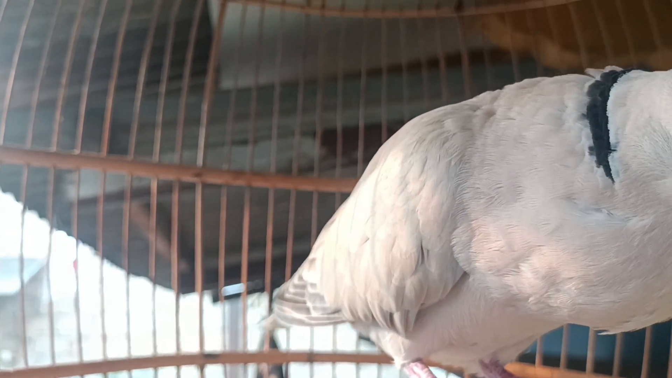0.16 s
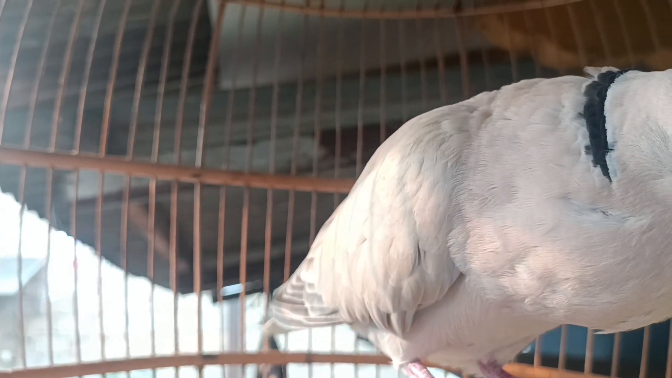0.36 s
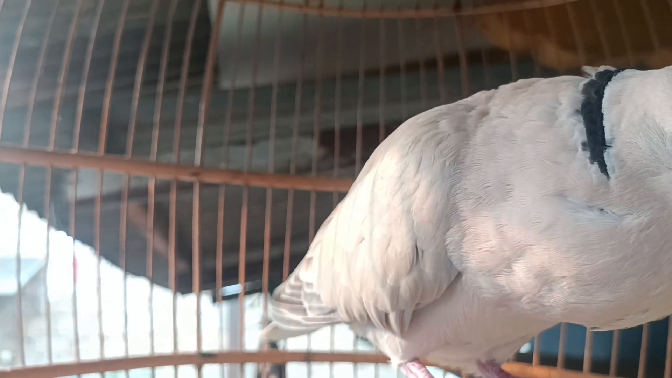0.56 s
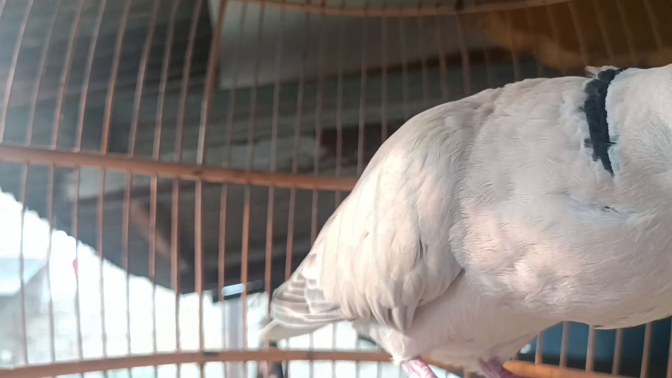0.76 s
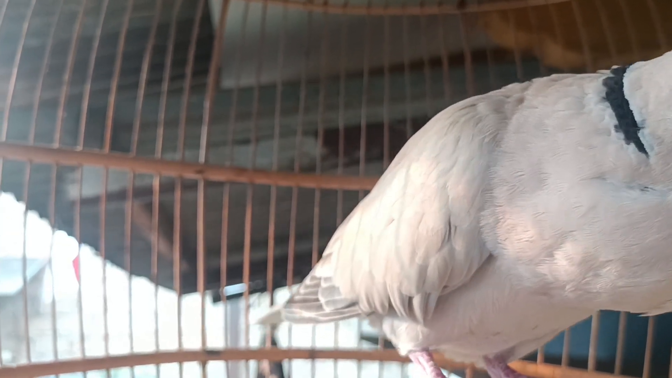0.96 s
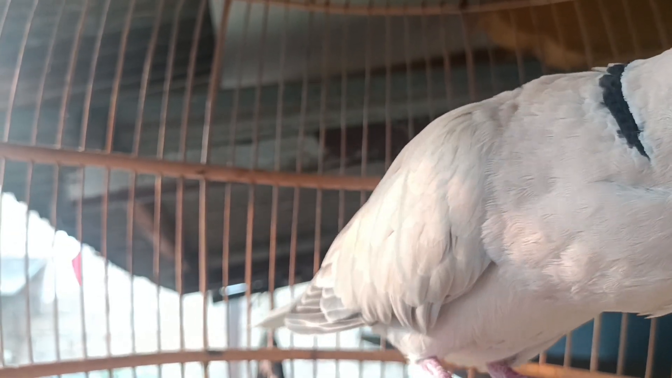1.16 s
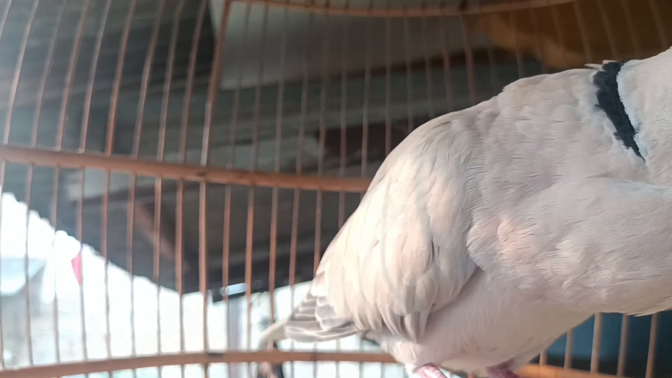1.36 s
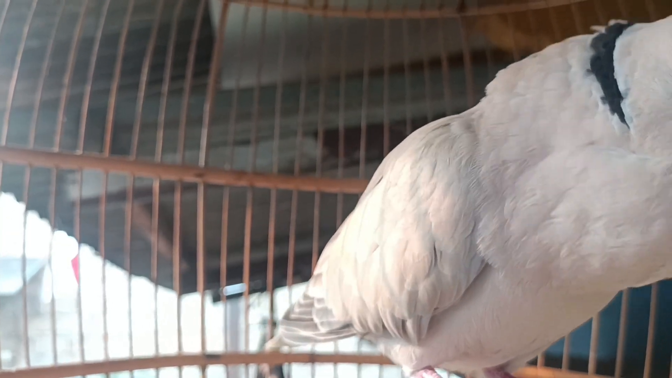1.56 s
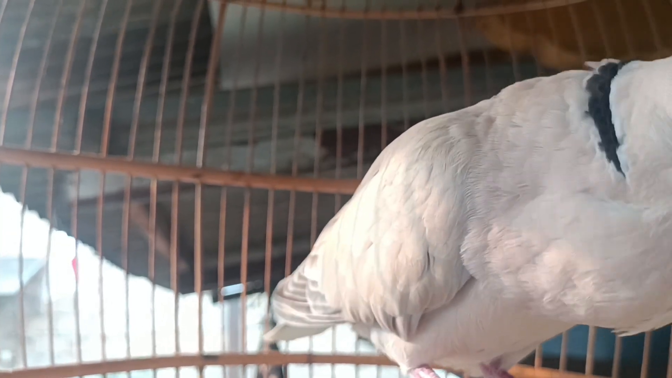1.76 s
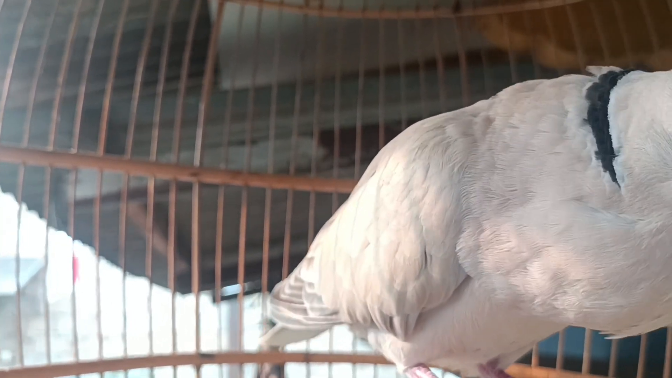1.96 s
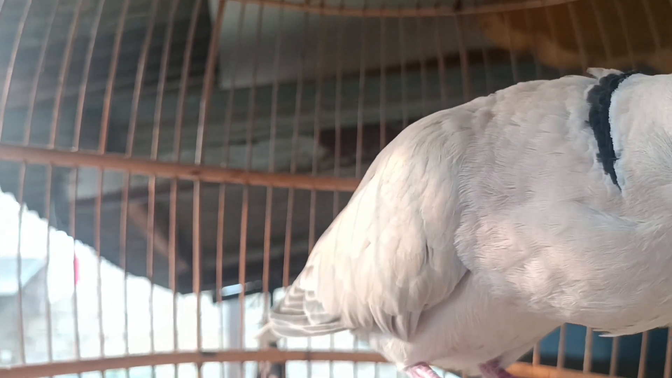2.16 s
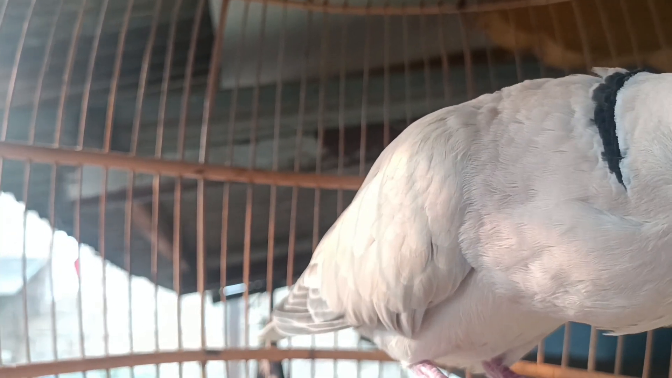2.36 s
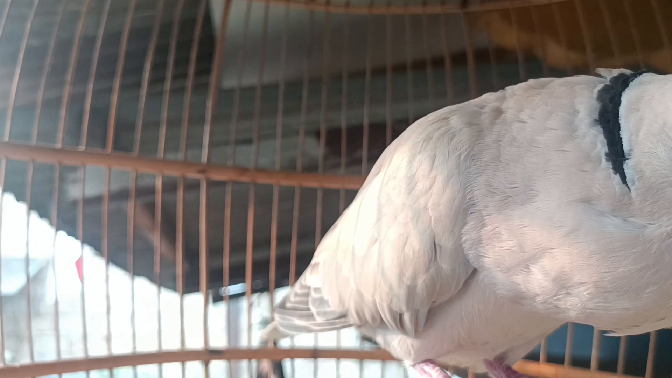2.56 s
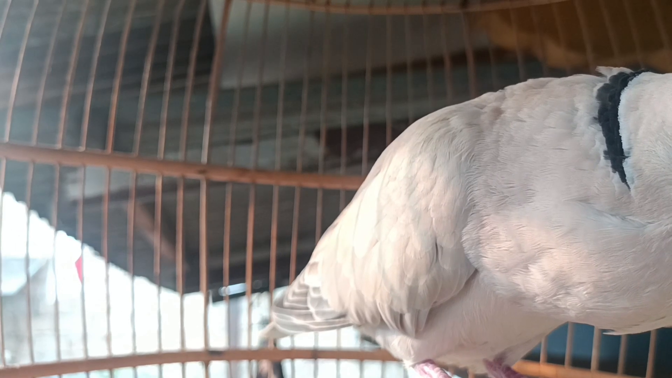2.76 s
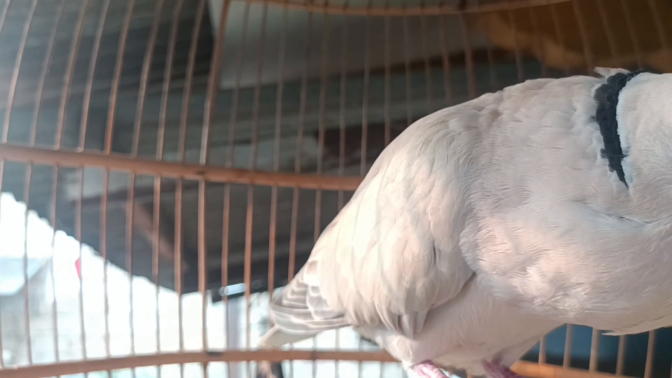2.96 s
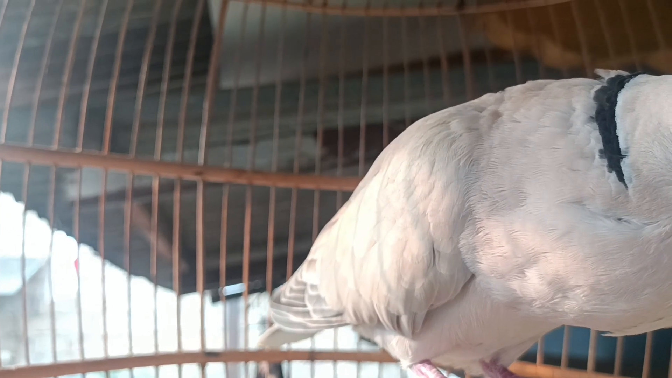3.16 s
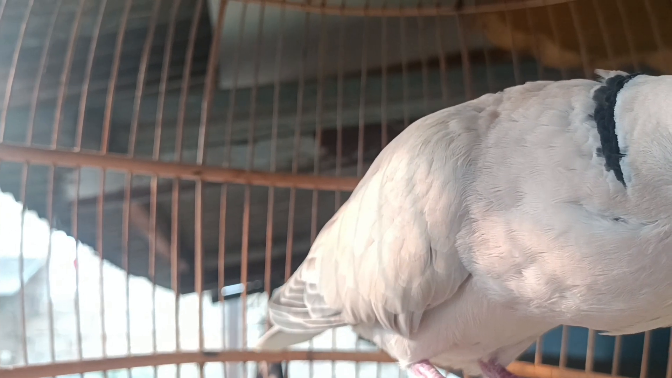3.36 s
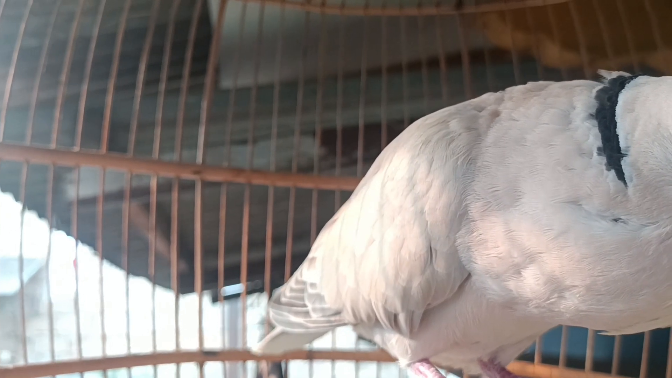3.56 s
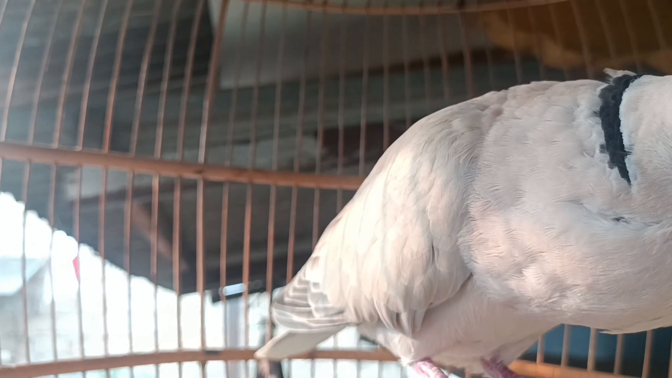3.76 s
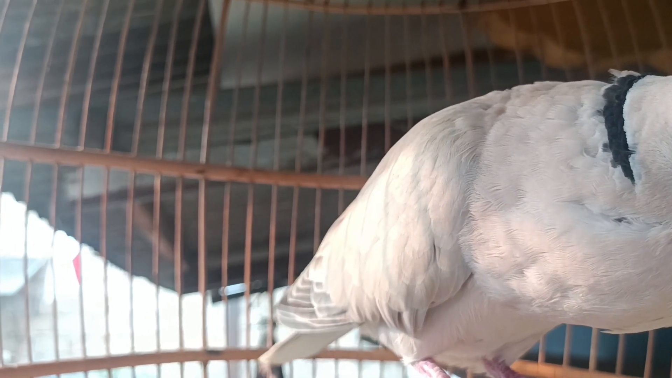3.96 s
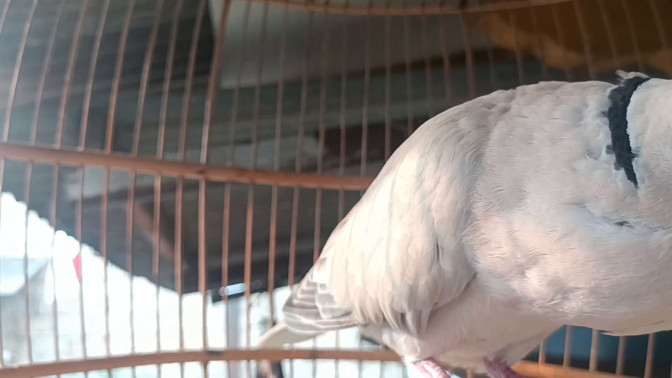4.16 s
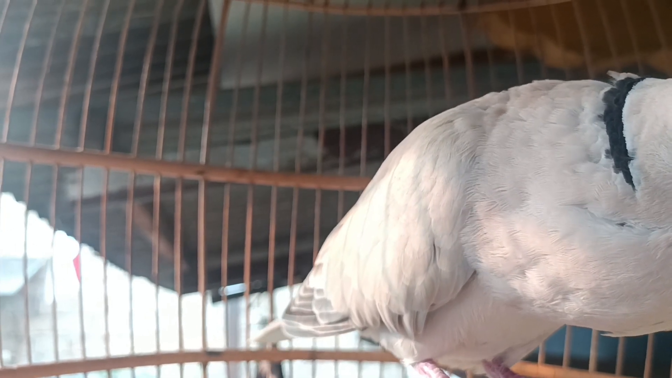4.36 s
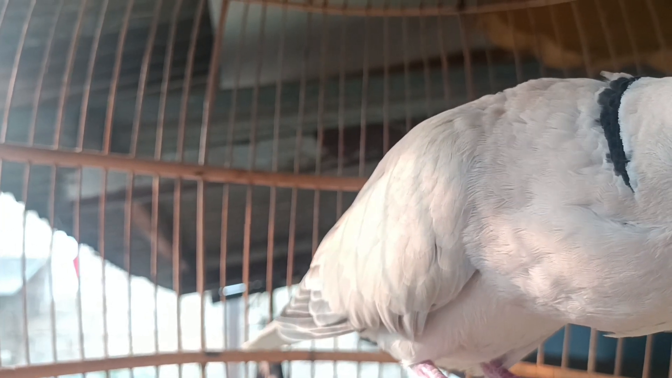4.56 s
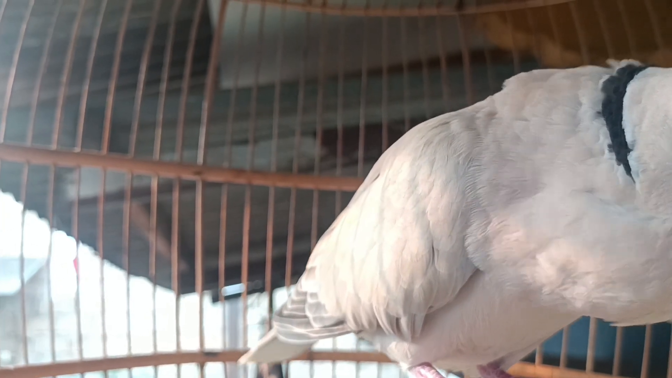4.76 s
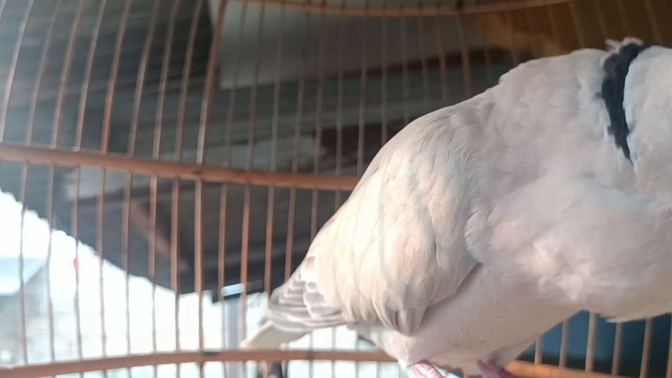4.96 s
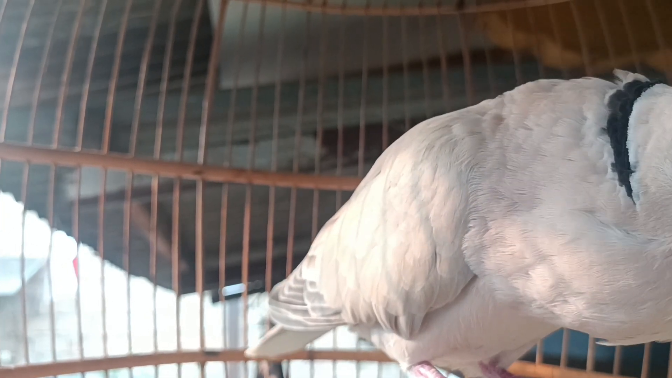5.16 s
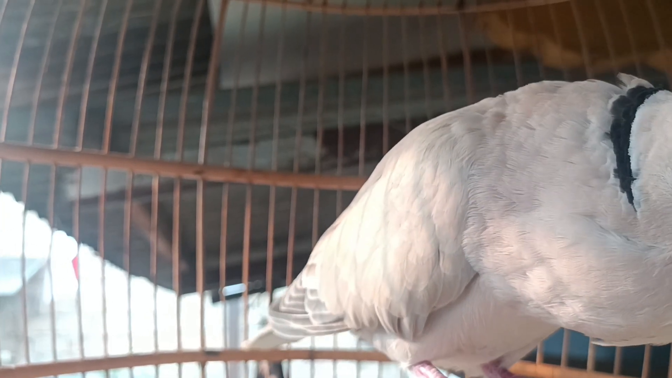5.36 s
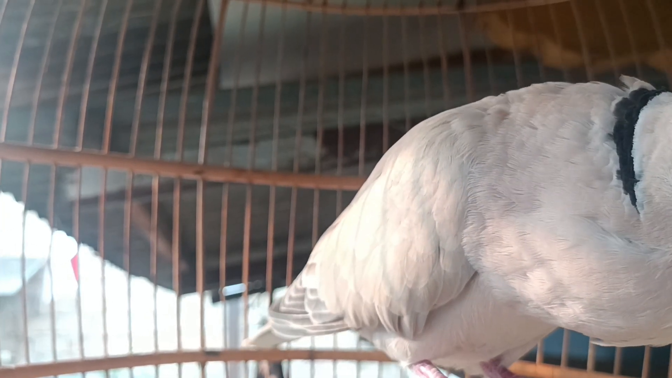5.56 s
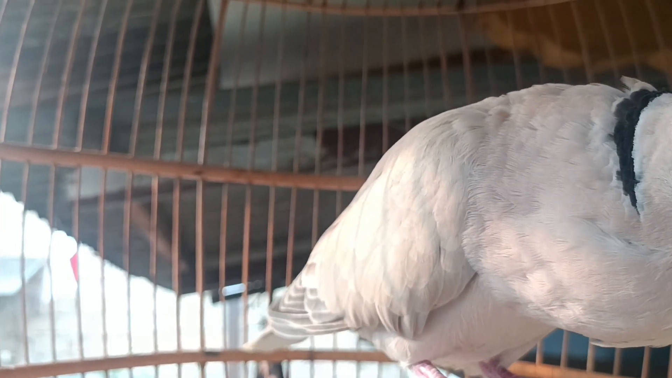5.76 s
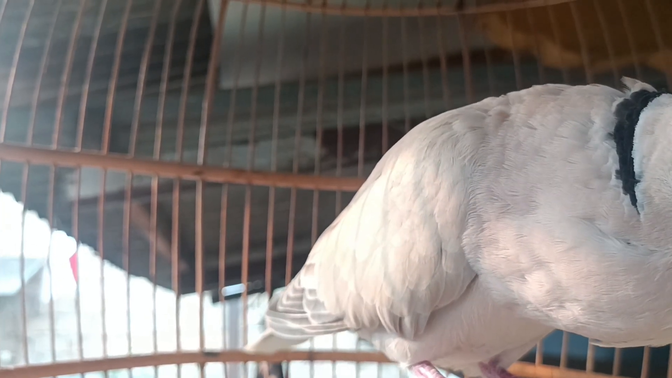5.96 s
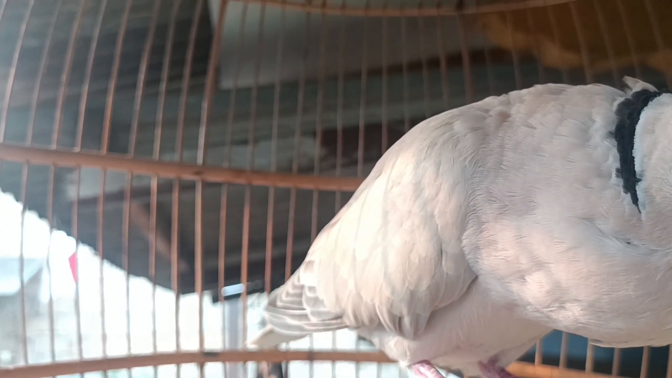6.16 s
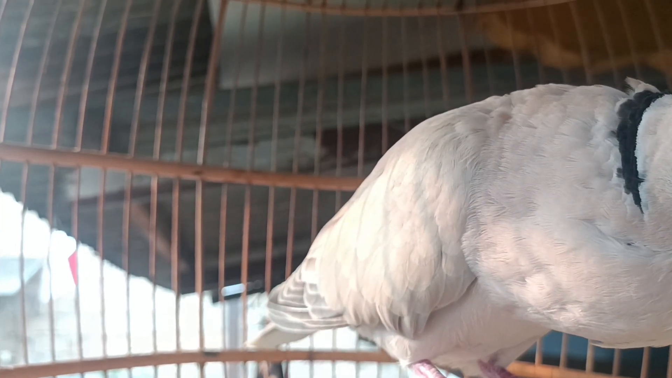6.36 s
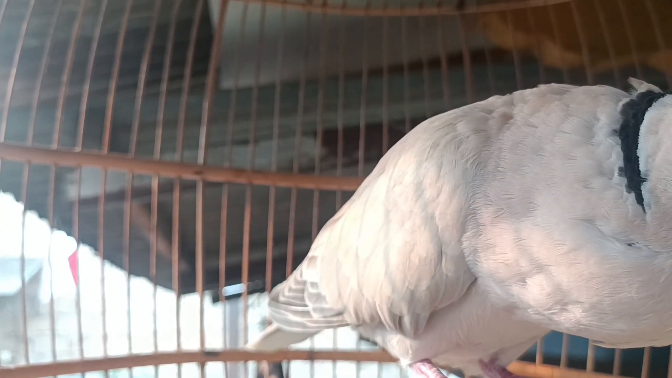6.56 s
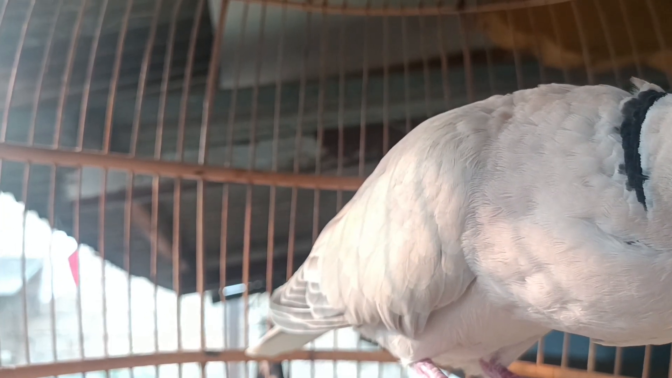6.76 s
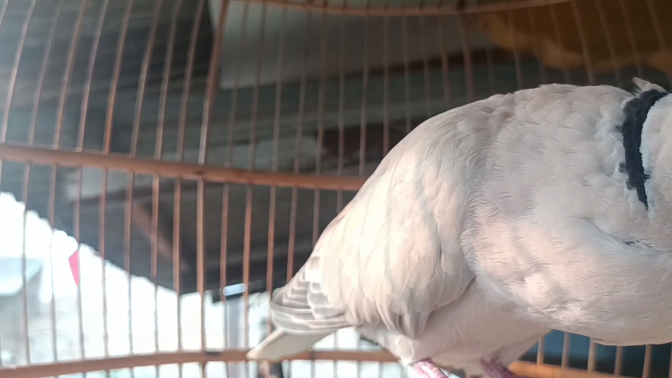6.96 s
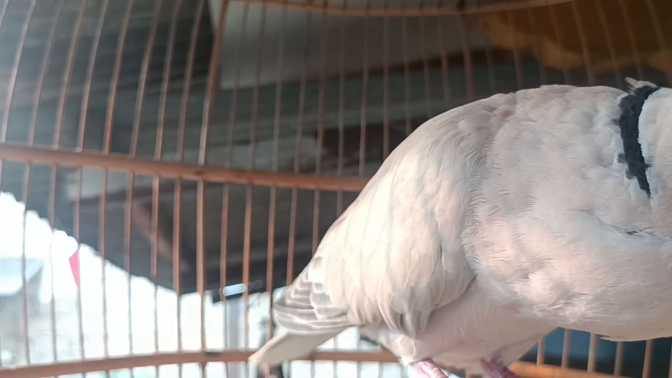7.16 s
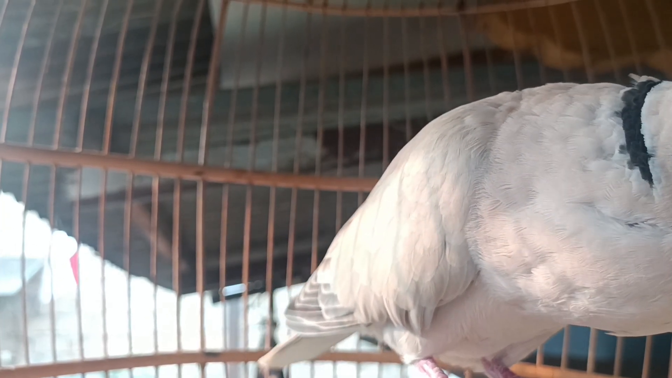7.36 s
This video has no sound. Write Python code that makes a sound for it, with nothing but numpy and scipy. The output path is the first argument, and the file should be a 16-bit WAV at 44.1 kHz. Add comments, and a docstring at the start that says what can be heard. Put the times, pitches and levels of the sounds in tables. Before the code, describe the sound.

Close, hollow dove cooing in falling notes and accelerating hoot rolls, soft nasal indrawn groans between phrases, a far hoarse animal wail, faint traffic rumble.

```python
"""A long falling coo opens the scene: a collared dove, close by, goes on with short notes and rolls of quick hoots.
One sliding sine rings through a crop resonance; tense high notes leak overtones. Feathers rustle as shaped noise.
Between phrases the dove draws air with a soft nasal groan, a harmonic buzz through chest and nose resonances.
Further off an animal gives one long cat-like wail, hoarse harmonics with a strong echo behind them.
Below lies a street, low banded noise with wavering motor hum; small noisy clicks dot the scene."""
import sys
import numpy as np
from scipy import signal
from scipy.io import wavfile
from scipy.ndimage import uniform_filter1d, minimum_filter1d

SR = 44100
rng = np.random.default_rng(int(sys.argv[2]) if len(sys.argv) > 2 else 0)


def pcm_store(signal):
    """Save signal as 16-bit PCM."""
    levels = np.round(np.clip(np.atleast_2d(signal), -1, 1) * 32767)
    wavfile.write(sys.argv[1], SR, levels.astype(np.int16).T)


N = 326781
TIME = np.arange(N) / SR   # seconds


def from_db(db):
    """Decibels to gain."""
    return 10 ** (np.asarray(db) / 20)


def rms_one(x):
    """Scale to unit power."""
    return x / np.sqrt(np.mean(x ** 2) + 1e-20)


def in_time(rows):
    """Each column of a curve at every sample; the first column is seconds."""
    seconds, *columns = np.transpose(sorted(map(tuple, rows)))
    return [np.interp(TIME, seconds, column) for column in columns]


def at_hz(points, hz):
    """Read a spectrum on a log-frequency axis."""
    f, value = np.transpose(points)
    return np.interp(np.log(hz), np.log(f), value)


def drift(rate_hz):
    """Slow chance with spread 1: noise through two equal one-pole lowpasses at rate_hz."""
    step = 40   # computed at every 40th sample, then interpolated
    r = np.exp(-2 * np.pi * step * rate_hz / SR)
    noise = rng.standard_normal(N // step + 2002)
    slow = signal.lfilter([1], [1, -2 * r, r * r], noise)[2000:]   # skip the filter's start
    return np.interp(np.arange(N) / step, np.arange(len(slow)), rms_one(slow))


def gate(spans, edge_s):
    """1 inside the spans, 0 outside, with rounded edges."""
    on = np.zeros(N)
    for start, end in spans:
        on[max(0, int(start * SR)):int(end * SR)] = 1
    width = max(2, int(edge_s * SR))
    return uniform_filter1d(uniform_filter1d(on, width), width)


def swell(middle_s, half_s):
    """A bell-shaped rise and fall of height 1."""
    return np.exp(-((TIME - middle_s) / half_s) ** 2)


def phase_of(hz):
    """Running phase of an oscillator."""
    return 2 * np.pi * np.cumsum(hz) / SR


def harmonics(hz, phase, spectrum, orders, flutter_db):
    """Harmonics of a pitch track through fixed resonances, each fluttering a little."""
    total = 0
    for k in orders:
        level_db = at_hz(spectrum, k * hz) + flutter_db * drift(12)
        total = total + from_db(level_db) * np.sin(k * phase)
    return np.sqrt(2) * total


def resonance(x, hz, width_hz):
    """Two-pole resonance with gain 1 on top."""
    r = np.exp(-np.pi * width_hz / SR)
    zeros = np.array([1, 0, -1]) * (1 - r * r) / 2
    poles = [1, -2 * r * np.cos(2 * np.pi * hz / SR), r * r]
    return signal.lfilter(zeros, poles, x + 1e-18)


# How alike left and right are in the noise beds. Each row: frequency in Hz, likeness (1 is mono).
STEREO_LIKENESS = [(30, 0.18), (400, 1), (1000, 0.2), (2200, 0.079), (5000, 0.44), (14000, 0.65)]


def banded_noise(spectrum, patchy_db):
    """Half-octave bands of stereo noise, each with its own flicker and likeness; rms 1."""
    edges = 22 * 2 ** np.arange(0, 9.6, .5)   # Hz
    out, white = 0, rng.standard_normal((2, 2, N))
    for k, (low, high) in enumerate(zip(edges, edges[1:])):
        if high < spectrum[0][0]:
            continue
        band = signal.butter(2, [low, high], "band", fs=SR, output="sos")
        mid, side = signal.sosfilt(band, white[k % 2])   # neighbouring bands use different noise
        hz = np.sqrt(low * high)
        alike = np.clip(at_hz(STEREO_LIKENESS, hz), -1, 1)
        stereo = np.sqrt(1 + alike) * mid + np.sqrt(1 - alike) * side * [[1], [-1]]
        out = out + from_db(at_hz(spectrum, hz) + patchy_db * drift(12)) * stereo
    return rms_one(out)


def reverb(x, t60_s, alike):
    """Dense reflections that die away, partly shared by the two microphones."""
    t = np.arange(SR) / SR
    decay = from_db(-60 * t / t60_s) * (t > .004)   # nothing for the first 4 ms
    mid, side = rng.standard_normal((2, SR)) * decay
    alike = np.clip(alike, 0, 1)
    tails = np.sqrt(1 + alike) * mid + np.sqrt(1 - alike) * side * [[1], [-1]]
    return signal.fftconvolve(x[None], tails / np.sqrt(np.sum(tails[0] ** 2)), axes=1)[:, :N]


def placed(x, right_lead_ms, left_louder_db):
    """A source reaches the two microphones at slightly different times and levels."""
    half_lag_s = right_lead_ms / 2000
    return np.array([np.interp(TIME - side * half_lag_s, TIME, x) * from_db(side * left_louder_db / 2)
                     for side in (1, -1)])


def sounding(calls, join_s=.006):
    """The spans in which the voice is on; calls that touch run into each other without a break."""
    spans = []
    for start, end in sorted((call[0][0], call[-1][0]) for call in calls):
        if spans and start - spans[-1][1] < join_s:
            start = spans.pop()[0]
        spans.append((start, end))
    return spans


# Long coos, sinking overall; the first two end in a low tail.
# One list per coo. Each row: time in seconds, pitch in Hz, tone level in dB.
LONG_COOS = [
    [(0.0, 650, -13.5), (0.008, 649, -18), (0.152, 608.5, -15.5), (0.306, 609.7, -16.5), (0.36, 605.4, -15),
     (0.424, 570.4, -11.5), (0.788, 545.5, -12.5), (0.878, 531.8, -8.5), (0.952, 511.6, -11),
     (0.976, 464.5, -9), (0.996, 449.4, -13.5), (1.044, 427, -15.5), (1.06, 444, -19)],
    [(3.003, 433, -16), (3.035, 486, -11.5), (3.049, 598, -17), (3.067, 623, -19.5), (3.399, 560.5, -15),
     (3.701, 530, -14.5), (3.845, 524.6, -12.5), (4.047, 494.8, -8.5), (4.087, 442, -14),
     (4.213, 423.5, -15), (4.253, 408.4, -17.5), (4.283, 349, -28), (4.31, 375, -33)],
    [(6.4, 432, -12), (6.424, 431, -9), (6.43, 452.5, -6.5), (6.444, 553, -13.5), (6.474, 602, -18.5),
     (6.564, 589, -18), (6.622, 568, -13), (6.644, 566, -18), (6.726, 558.2, -15.5), (7.004, 531.7, -14.5),
     (7.148, 521.2, -14.5), (7.164, 526.2, -12.5), (7.41, 502.2, -10.5)],
]
# Quick downward hoots. Each row: start in seconds, length in seconds, lowest pitch in Hz, effort in dB.
QUICK_HOOTS = [(2.329, 0.0076, 441, -15.5), (2.373, .019, 389, -6.5), (2.416, .018, 434.3, -5),
               (2.464, .02, 433.6, -3.5), (2.512, .022, 441, -0.5), (2.563, .023, 434, -1.5),
               (2.612, .027, 502, 0.5), (2.666, .035, 458, 2.5), (2.728, 0.039, 457, 1),
               (2.795, .054, 454, 1), (2.871, .039, 428, 2), (2.966, 0.048, 426, 1),
               (5.577, 0.0064, 420, -17), (5.624, 0.0083, 418, -5), (5.666, .018, 425, -5),
               (5.708, .02, 429, -5), (5.755, .021, 431, -1.5), (5.804, .026, 450.6, -2.5),
               (5.858, 0.033, 493.5, -1), (5.92, .034, 494.4, -1.5), (5.981, .041, 495, -2),
               (6.052, .047, 485, -1), (6.127, .054, 449, 0), (6.208, .041, 444.4, 0.5),
               (6.361, .042, 418, 0)]
# Short notes that scoop up, then sag. Each row: start in seconds, length in seconds, scoop in seconds,
# top pitch in Hz before the sag, effort in dB, level offset at the start in dB.
SHORT_NOTES = [(1.85, .294, .033, 664.3, .5, -9.5), (2.91, 0.032, 0.036, 620.6, 3.5, -2),
               (5.138, .276, .034, 655.4, -0.5, -5), (6.245, 0.077, .042, 624.5, -0.5, 4.5)]
# Overtones that leak through the closed beak at full tension. Each row: frequency in Hz, level in dB rms.
BEAK_OVERTONES = [(900, -59), (1080, -54.5), (1250, -45), (1600, -52.5), (1900, -49.5), (2200, -73),
                  (2750, -71), (3500, -84), (5000, -84), (5700, -77.5), (6600, -82)]
CROP_DB, GLIDE_S, STOP_S = -11, .003, .0036
AIR_DB, AIR_FULL_AT_DB, AIR_GROWTH = -66, -10.5, 1.8   # growth: dB of air per dB of voice below full


def coo(edge_s=0.0032, jitter=0.0024, shimmer_db=0.97, crop_hz=465, crop_width_hz=20,
        leak_hz=485, leak_range_hz=80, whistle_hz=6700, whistle_width_hz=330, whistle_db=-67):
    """One syrinx sings hoots and held notes; the inflated crop favours the fundamental and rings on."""
    calls = list(LONG_COOS)
    calls += [hoot(*row) for row in QUICK_HOOTS]
    calls += [short_note(*row) for row in SHORT_NOTES]
    # the muscles smooth every change of pitch and level
    tracks = np.array(in_time([point for call in calls for point in call]))
    hz, level_db = uniform_filter1d(tracks, max(1, int(GLIDE_S * SR)))
    hz = hz * (1 + jitter * drift(63))
    phase, voiced = phase_of(hz), gate(sounding(calls), edge_s)
    # the membranes start at once but take a few cycles to stop
    keep = np.exp(-1 / (STOP_S * SR))
    voiced = np.maximum(voiced, signal.lfilter([1 - keep], [1, -keep], voiced + 1e-18))
    tone = np.sqrt(2) * voiced * from_db(level_db + shimmer_db * drift(15)) * np.sin(phase)
    crop = from_db(CROP_DB) * resonance(tone, crop_hz, crop_width_hz)
    # overtones appear only when the membranes are tense and the pitch is high
    tension = np.clip((hz - leak_hz) / leak_range_hz + .5, 0, 1)
    overtones = harmonics(hz, phase, BEAK_OVERTONES, range(2, 4), flutter_db=1.0)
    overtones += harmonics(hz, phase, BEAK_OVERTONES, range(4, 11), flutter_db=6.0)
    # one high overtone whistles while it crosses a narrow resonance of the beak
    order = 11
    whistle = np.sqrt(2) * from_db(whistle_db + 2 * drift(20)) * np.sin(order * phase)
    overtones += whistle / np.hypot(1, 2 * (order * hz - whistle_hz) / whistle_width_hz)
    air = voiced * from_db(AIR_DB + AIR_GROWTH * np.minimum(level_db - AIR_FULL_AT_DB, 0))
    return tone + crop, voiced * tension * overtones, air


# Grainy rustles as the bird shifts. Each row: middle in seconds, half length in seconds, level in dB.
FEATHER_RUSTLES = [(0.04, .15, -69.5), (.52, .1, -72), (.93, .05, -63.5), (1.37, .05, -64),
                   (2.42, .055, -58), (4.021, 0.041, -62.5), (4.24, .06, -69), (4.98, .22, -69),
                   (5.65, .13, -60.5), (6.55, .3, -61.5), (7.25, .22, -57.5)]
# Small noisy clicks, several at the loudest moments of the voice. Each row: start in seconds, level in dB.
VOICE_AND_BACKGROUND_CLICKS = [(2.691, -58), (3.027, -60.5), (4.069, -59), (4.59, -56), (5.069, -61),
                               (5.58, -53), (5.81, -70), (6.561, -56.5), (6.79, -55.5), (7.018, -57)]
# Relative colour of rustle, air and clicks. Each row: frequency in Hz, density in dB per Hz.
RUSTLE_COLOUR = [(800, 2.5), (2500, 4), (4000, 4.5), (7000, -3), (10000, -6.5), (15000, -10)]


def rustle_air_and_clicks(air, click_s=0.011, grain_db=3):
    """One noise shaped by swells for feathers, by the voice for its air, and by short decays for clicks."""
    rustle = sum(from_db(db) * swell(s, half_s) for s, half_s, db in FEATHER_RUSTLES)
    strength = np.hypot(rustle, air) * from_db(grain_db * drift(120))
    for s, db in VOICE_AND_BACKGROUND_CLICKS:
        at = int(s * SR)
        strength[at:] += from_db(db) * np.exp(-TIME[:N - at] / click_s)
    return strength * banded_noise(RUSTLE_COLOUR, patchy_db=0.5)


# Relative colour of the street noise. Each row: frequency in Hz, density in dB per Hz.
STREET_COLOUR = [(25, -23.5), (42, -12.5), (62, -11), (100, -8.5), (125, -0.5), (190, -2.5), (260, -7),
                 (450, -5), (800, -16.5), (1400, -22.5), (2500, -24), (3800, -36), (7000, -40),
                 (15000, -52.5)]
# Motors in the street. Each row: centre pitch in Hz, mid level in dB against the street level.
MOTOR_HUM = [(64, -17.5), (80, -17.5), (99.8, -8.5), (145, -9.5), (190, -9.5)]
# Level of the low background noise over time. Each row: time in seconds, level in dB.
BACKGROUND_LEVEL = [(0.0, -44), (3.91, -44.5), (4.19, -46), (5.1, -44.5), (5.18, -49.5), (5.61, -42),
                    (6.21, -44.5), (7.1, -43)]
STREET_LEVEL_DB = -0.3   # overall level of the street, added to its curve


def street():
    """Low traffic noise and sines of motor hum that waver in pitch and level."""
    level_db, = in_time(BACKGROUND_LEVEL)
    hum = 0
    for hz, db in MOTOR_HUM:
        loudness = from_db(db + 4.7 * drift(28))
        hum = hum + np.sqrt(2) * loudness * np.sin(phase_of(hz * (1 + .03 * drift(7))))
    noise = banded_noise(STREET_COLOUR, patchy_db=.6)
    noise = signal.sosfilt(signal.butter(2, 56, "high", fs=SR, output="sos"), noise)
    return from_db(STREET_LEVEL_DB + level_db) * (noise + hum)


# The dove's groans as it draws air. Each row: start in seconds, length in seconds, first pitch in Hz,
# held pitch in Hz, strongest pull at seconds, pitch lift there in Hz, chest level in dB before its colour,
# dB added to the chest by the first gasp.
INDRAWN_GROANS = [(1.091, .7, 225.4, 175.4, 1.67, 4.4, -49.5, 8),
                  (4.445, .67, 193.4, 182.7, 4.95, 13, -49, -2.5)]
# Chest colour. Each row: frequency in Hz, level of a harmonic in dB.
CHEST_COLOUR = [(170, -3.5), (350, 7), (550, 5), (720, -33.5), (1000, -46), (3000, -44.5)]
# Nose colour. Each row: frequency in Hz, level of a harmonic in dB.
NOSE_COLOUR = [(170, -39), (550, -28), (700, -5.5), (800, 8.5), (880, 2), (1020, -31), (1300, -40),
               (3000, -12)]
GROAN_SETTLE_S, GROAN_DROOP_HZ, GROAN_DROOP_S = 0.074, 30, 0.054
NOSE_REST_DB, NOSE_OPEN_DB, PULL_S = -66, 22, 0.12   # the nose opens around the strongest pull


def groan(start, length, first_hz, held_hz, pull_s, lift_hz, chest_db, gasp_db, jitter=.005,
          hiss_hz=3250, hiss_width_hz=120, hiss_db=-68, count=12):
    """Indrawn air buzzes, settles, lifts and droops through chest and nose, and hisses in the nostrils."""
    t, pull = np.clip(TIME - start, 0, length), swell(pull_s, PULL_S)
    gasp = np.exp(-t / GROAN_SETTLE_S)
    droop_hz = GROAN_DROOP_HZ * np.exp((t - length) / GROAN_DROOP_S)
    hz = held_hz + (first_hz - held_hz) * gasp + lift_hz * pull - droop_hz
    hz = hz * (1 + jitter * drift(72))
    phase, orders = phase_of(hz), range(1, count + 1)
    chest = harmonics(hz, phase, CHEST_COLOUR, orders[:count // 2], flutter_db=2.0)
    chest = from_db(chest_db + gasp_db * gasp) * chest
    nose = harmonics(hz, phase, NOSE_COLOUR, orders, flutter_db=3.5)
    nose = from_db(NOSE_REST_DB + NOSE_OPEN_DB * pull) * nose
    hiss = rms_one(resonance(rng.standard_normal(N), hiss_hz, hiss_width_hz))
    hiss = from_db(hiss_db) * np.sin(np.pi * t / length) * hiss
    return gate([(start, start + length)], edge_s=0.012) * (chest + nose) + hiss


# Loudest where the pitch meets the crop's resonance; hoots use it too.
# Each row: pitch in Hz, level in dB.
CROP_LOUDNESS = [(380, -19.5), (420, -16), (455, -9), (490, -8.5), (530, -15), (570, -12.5), (610, -18),
                 (660, -15.5)]
SCOOP_FROM_HZ, SCOOP_CURVE, NOTE_ATTACK_S = 425, 2.7, 0.02
SAG_SHARE, SAG_S = .112, .1   # how far and how quickly a held pitch sinks


def short_note(s, length, scoop_s, top_hz, effort_db, soft_db):
    """A quickening scoop to the top pitch, then a slow sag: rows of (s, Hz, dB)."""
    t = np.linspace(0, length, num=100)
    hz = SCOOP_FROM_HZ + (top_hz - SCOOP_FROM_HZ) * np.minimum(t / scoop_s, 1) ** SCOOP_CURVE
    hz = hz * (1 - SAG_SHARE * (1 - np.exp(-np.maximum(t - scoop_s, 0) / SAG_S)))
    attack_db = np.interp(t, [0, NOTE_ATTACK_S], [soft_db, 0])
    return np.transpose([s + t, hz, effort_db + attack_db + at_hz(CROP_LOUDNESS, hz)])


# Pitch at the start of a hoot: longer hoots start higher. Each row: length in seconds, pitch in Hz.
HOOT_START_PITCH = [(.015, 445), (.023, 482.3), (.031, 540), (.043, 588)]
HOOT_FALL_S = 0.035   # the slide takes at most this long
HOOT_ATTACK_S, HOOT_ATTACK_DB = .007, -4   # each hoot starts this much softer


def hoot(s, length, low_hz, effort_db):
    """A slide from a start that is higher the longer the hoot: rows of (s, Hz, dB)."""
    t = np.linspace(0, length, num=24)
    start_hz = np.interp(length, *np.transpose(HOOT_START_PITCH))
    hz = np.interp(t, [0, min(length, HOOT_FALL_S)], [start_hz, low_hz])
    attack_db = np.interp(t, [0, HOOT_ATTACK_S], [HOOT_ATTACK_DB, 0])
    return np.transpose([s + t, hz, effort_db + attack_db + at_hz(CROP_LOUDNESS, hz)])


# The far wail. Each row: time in seconds, pitch in Hz, level in dB before throat colour and distance.
WAIL_LINE = [(4.619, 483, -64), (4.69, 516.6, -47), (4.8, 592, -40), (4.95, 666.3, -36),
             (5.099, 595.7, -39.5), (5.278, 563.4, -41), (5.849, 525.6, -44), (6.12, 512.6, -50),
             (6.3, 518.3, -46), (6.39, 533, -41), (6.489, 607.5, -42.5), (6.601, 596, -57)]
# Throat colour. Each row: frequency in Hz, level of a harmonic in dB.
THROAT_COLOUR = [(520, -22.5), (1050, -3), (1300, -1), (1600, 0), (1900, -6), (2200, -1), (2450, 4.5),
                 (2700, -16), (3200, -22.5), (3700, -32), (4300, -31.5)]
# Air rasping through the wailing throat. Each row: frequency in Hz, width in Hz, relative level in dB.
HOARSE_AIR = [(1260, 200, -3), (1940, 180, -1.5), (2220, 140, 2.5)]
HOARSE_DB, WAIL_DIRECT_DB, WAIL_ECHO_DB = -7, -2, -4.5
WAIL_ROUGH_START, WAIL_ROUGH_MIDDLE, WAIL_ROUGH_END = .62, .14, 0.99   # roughness 0-1
WAIL_CLEARS_S, WAIL_BREAKS_S = .7, .45   # clears this long after its start, breaks up this long before its end
YELP_S, YELP_LENGTH_S, YELP_DB = 6.78, .01, -44   # a last hoarse catch after the wail


def wail(jitter=.018, rasp=0.23, second_db=9, count=8):
    """A far cry of throat harmonics, hoarse and fuller at both ends, with a strong echo behind it."""
    hz, level_db = in_time(WAIL_LINE)
    start, end = WAIL_LINE[0][0], WAIL_LINE[-1][0]
    rough = np.interp(TIME, [start, start + WAIL_CLEARS_S, end - WAIL_BREAKS_S, end - WAIL_BREAKS_S / 2],
                      [WAIL_ROUGH_START, WAIL_ROUGH_MIDDLE, WAIL_ROUGH_MIDDLE, WAIL_ROUGH_END])
    hz = hz * (1 + jitter * rough * drift(70))
    phase = phase_of(hz)
    low = harmonics(hz, phase, THROAT_COLOUR, range(1, 3), flutter_db=1.5)
    low = from_db(second_db * (rough - 1.0)) * low
    cry = low + harmonics(hz, phase, THROAT_COLOUR, range(3, count + 1), flutter_db=3.0)
    puffs = rng.standard_normal(N) * (1 + np.cos(phase))   # air pulses with each cycle
    breath = rms_one(sum(from_db(db) * resonance(resonance(puffs, f, width), f, width)
                         for f, width, db in HOARSE_AIR))
    cry = cry * (1 + rasp * rough * drift(160))   # uneven cycles rasp
    cry = cry + from_db(HOARSE_DB) * rough * breath
    envelope = from_db(level_db) * gate([(start, end)], edge_s=.02)
    cry = cry * (envelope + from_db(YELP_DB) * swell(YELP_S, YELP_LENGTH_S))
    direct = from_db(WAIL_DIRECT_DB) * placed(cry, right_lead_ms=-0.14, left_louder_db=-1.5)
    return direct + from_db(WAIL_ECHO_DB) * reverb(cry, t60_s=0.6, alike=0.36)


PORCH_DB, PORCH_BUZZ_DB, PORCH_T60_S, PORCH_LIKENESS = -18.5, -10, .33, .35
NOOK_HZ, NOOK_WIDTH_HZ, NOOK_DB = 596, 8, -17


def scene():
    """The dove sways close to the microphones under a small roof, the rest lies behind it."""
    tone, overtones, air = coo()
    buzz = overtones + sum(groan(*row) for row in INDRAWN_GROANS)
    dove = placed(tone + buzz, right_lead_ms=0.056 + 0.011 * drift(0.99), left_louder_db=.5 * drift(0.49))
    porch = from_db(PORCH_DB) * reverb(tone, PORCH_T60_S, PORCH_LIKENESS)
    porch = porch + from_db(PORCH_BUZZ_DB) * reverb(buzz, PORCH_T60_S, PORCH_LIKENESS)
    # a standing wave under the roof sings on after notes near its pitch
    standing = resonance(tone, NOOK_HZ, NOOK_WIDTH_HZ)
    nook = from_db(NOOK_DB) * placed(standing, right_lead_ms=0, left_louder_db=-8.5)
    return dove + porch + nook + rustle_air_and_clicks(air) + street() + wail()


def record(dry):
    """A fast limiter holds the peaks; a steep lowpass cuts the top."""
    ceiling, hold = .505, int(.006 * SR)   # full scale is 1; hold in samples
    gain = ceiling / np.maximum(np.abs(dry).max(axis=0), ceiling)
    limited = dry * uniform_filter1d(minimum_filter1d(gain, 2 * hold), hold)
    lowpass = signal.cheby2(12, 70, 16740, fs=SR, output="sos")   # 70 dB down from 16740 Hz
    return signal.sosfilt(lowpass, limited)


dry = scene()
out = record(dry)
pcm_store(out)
```